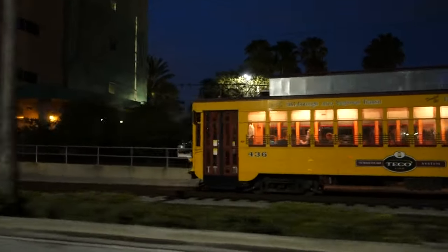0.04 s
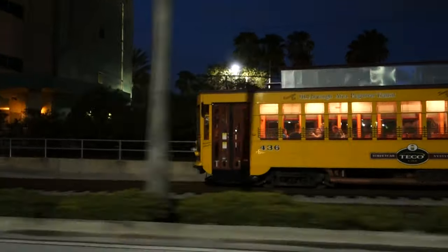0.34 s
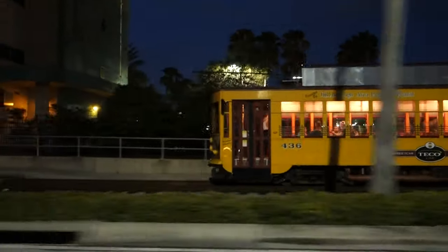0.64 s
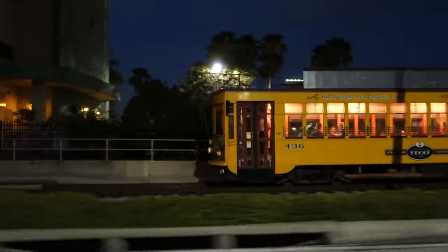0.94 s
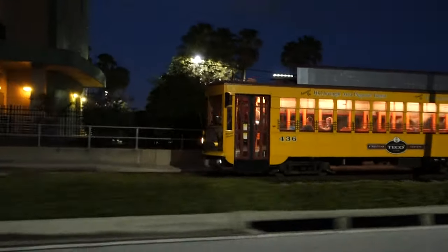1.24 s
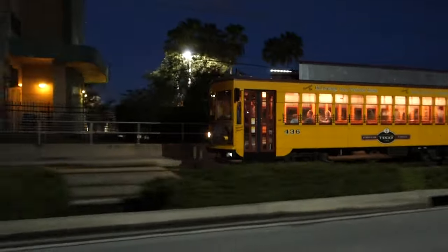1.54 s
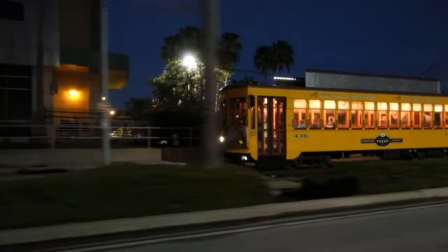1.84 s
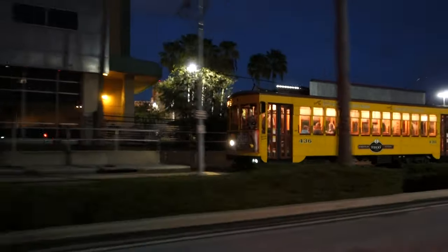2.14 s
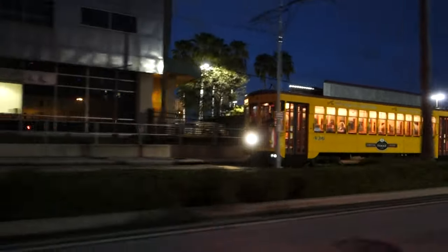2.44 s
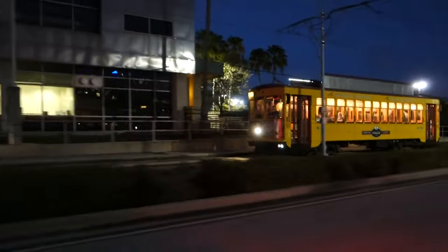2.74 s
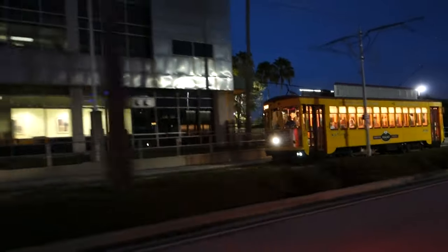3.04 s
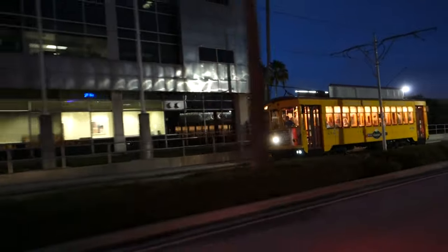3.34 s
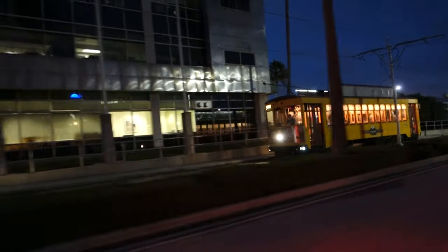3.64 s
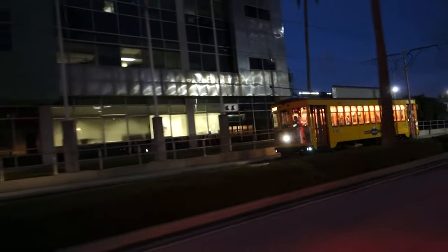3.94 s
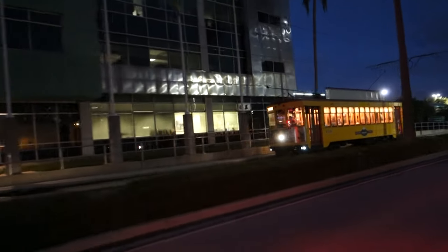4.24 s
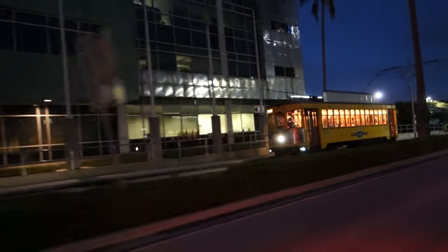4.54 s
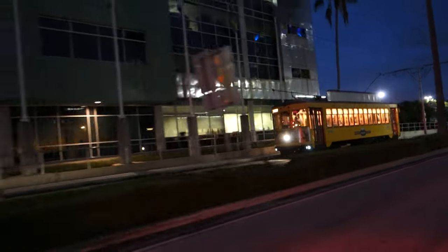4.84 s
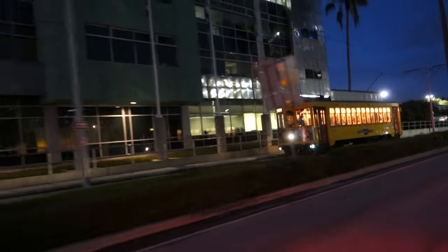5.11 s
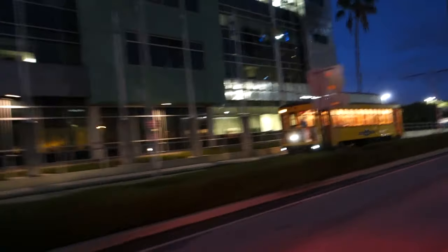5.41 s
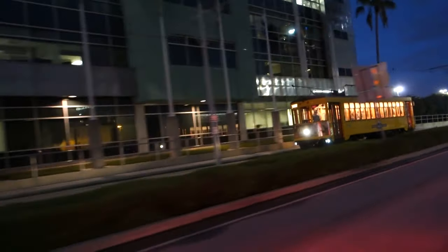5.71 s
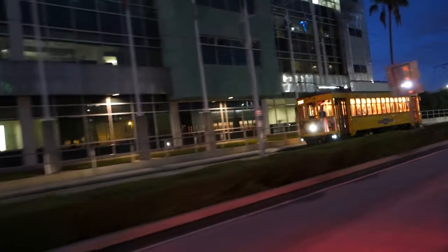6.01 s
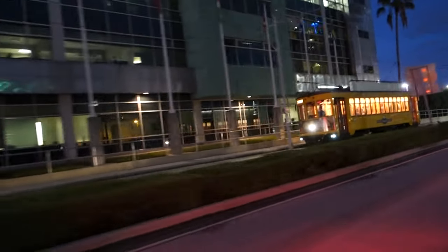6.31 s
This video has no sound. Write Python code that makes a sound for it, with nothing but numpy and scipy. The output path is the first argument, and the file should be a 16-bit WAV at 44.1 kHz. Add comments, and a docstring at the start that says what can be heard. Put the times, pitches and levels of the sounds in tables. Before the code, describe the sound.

Wind tears at a microphone by the open window of a car moving along a city street. It starts as a dense, rasping roar with crackles and sharp pops, strongest about a second in. Around halfway the rush drops away, leaving separate dull thumps and short puffs of air. A low rumble of car and road runs underneath throughout.

```python
"""Wind tearing at a microphone port, at the open window of a car on a city street.
The slipstream is a dense roar at first, then separate buffets as the flow eases.
Faster air makes smaller eddies and a brighter rasp; single eddies thump and pop on the port,
with crackles and ticks on top. Car and road rumble underneath. A fast limiter holds the blows down."""
import sys
import numpy as np
from scipy import signal
from scipy.fft import rfft, irfft, next_fast_len
from scipy.io import wavfile
from scipy.ndimage import uniform_filter1d

SR = 44100
rng = np.random.default_rng(int(sys.argv[2]) if len(sys.argv) > 2 else 0)


def waveform_to_disk(signal):
    """Save audio, clipped to [-1, 1], as 16-bit WAV at the path in sys.argv[1]."""
    frames = np.transpose(np.atleast_2d(signal))
    scaled = np.clip(frames, -1, 1) * 32767
    samples = np.round(scaled).astype(np.int16)
    wavfile.write(sys.argv[1], SR, samples)


N = 280917
TIME_S = np.arange(N) / SR
FULL_FLOW_DB = -10

# steady stream over the port: time_s, strength_db
STREAM = [(0.0, -13), (0.04, -29.5), (0.12, -21.5), (0.44, -18), (0.52, -13.5), (0.6, -1), (0.69, -6.5),
          (0.79, -15), (0.86, -5), (1.06, -1), (1.24, -15), (1.28, -18.5), (1.66, -22), (2.27, -20.5),
          (2.44, -26), (2.56, -18), (2.72, -17), (2.84, -37.5), (3.7, -41), (4.6, -42), (6.37, -43)]
# large eddies hitting the port: start_s, strength_db, hold_s, treble_db
BUFFETS = [(0.087,-14.5,0.022,-6), (0.172,-7,0.0098,-0.5), (0.232,-16,0.0083,8), (0.262,-17,0.026,14),
           (0.334,-10,0.0081,-11), (0.398,-9.5,0.0095,-9), (0.486,-11.5,0.01,6), (0.532,-13,0.015,5),
           (0.837,-14,0.028,21), (0.987,-5,0.025,-4), (1.043,-7.5,0.067,-8), (1.235,-2.5,0.02,-9.5),
           (1.339,-9,0.0051,-5), (1.507,-5,0.0056,-10.5), (1.644,-5.5,0.025,-17.5), (1.667,-6,0.0051,2),
           (1.909,-6.5,0.012,-13.5), (1.989,-10,0.013,-12), (2.059,-6,0.015,-11.5), (2.258,-15,0.005,-5),
           (2.436,-13,0.0015,4), (2.544,-11,0.0068,-1.5), (2.66,-16.5,0.026,-1.5), (2.78,-21,0.0028,3),
           (2.929,-14.5,0.015,-12.5), (2.994,-14,0.0065,-19), (3.032,-17.5,0.0061,-12),
           (3.06,-15.5,0.0043,-15), (3.097,-20,0.014,-20), (3.209,-21,0.0037,-19), (3.329,-20.5,0.0069,-10),
           (3.404,-17.5,0.0068,-5), (3.486,-24.5,0.013,-6), (3.532,-14.5,0.0076,-6), (3.689,-18,0.016,-29),
           (3.723,-17,0.0099,-17), (3.847,-25.5,0.021,-29), (3.893,-17.5,0.022,-22), (3.911,-15,0.011,-16),
           (4.078,-20,0.012,-8.5), (4.247,-23,0.037,-27), (4.329,-14,0.028,-24), (4.407,-19,0.039,-31),
           (4.54,-24,0.0068,-25), (4.638,-28.5,0.0072,-11.5), (4.699,-25,0.036,-30), (4.831,-14,0.0051,-15),
           (4.909,-22.5,0.011,-24), (5.004,-13,0.0058,-31), (5.151,-11.5,0.0068,-13), (5.206,-17,0.019,-16),
           (5.335,-18,0.0095,-11.5), (5.428,-24,0.028,-28), (5.537,-17,0.0073,-33), (5.774,-31.5,0.03,-16),
           (6.188,-26,0.0075,-31), (6.364,-11,0.012,-39)]


def from_db(db):
    return 10 ** (np.asarray(db) / 20)


def power_db(power):
    return 10 * np.log10(np.maximum(power, 1e-12))


def rms_one(x):
    return x / np.sqrt(np.mean(x ** 2) + 1e-20)


def in_time(rows):
    """Time curve at every sample."""
    time_s, value = np.transpose(rows)
    return np.interp(TIME_S, time_s, value)


def at_hz(rows, hz):
    """Table lookup on a log-frequency axis."""
    known_hz, value = np.transpose(rows)
    return np.interp(np.log(np.maximum(hz, 1)), np.log(known_hz), value)


def bins_hz():
    """Frequencies of the padded spectrum."""
    return np.fft.rfftfreq(2 * next_fast_len(N // 2 + SR // 10), 1 / SR)


def lowpass(order, cutoff_hz):
    return signal.butter(order, cutoff_hz, fs=SR, output="sos")


def drift(rate_hz):
    """Smooth random curve, rms 1."""
    hop, settle = 20, 2000
    pole = np.exp(-2 * np.pi * rate_hz * hop / SR)
    white = rng.standard_normal(N // hop + settle + 2)
    slow = signal.lfilter([1], [1, -2 * pole, pole * pole], white)[settle:]
    return np.interp(np.arange(N) / hop, np.arange(len(slow)), rms_one(slow))


def smooth_power(x, window_s):
    size = int(window_s * SR)
    return uniform_filter1d(uniform_filter1d(np.mean(x ** 2, axis=0), size), size)


def evened(x, window_s):
    """Noise with its chance swells levelled, power kept."""
    return rms_one(x * from_db(-power_db(smooth_power(x, window_s)))) * x.std()


def scattered(per_s, level_db, spread_db):
    """Randomly timed impulses of uneven size."""
    return (rng.random(N) < per_s / SR) * from_db(level_db + spread_db * rng.standard_normal(N))


def snaps(hits, decay_s, band_hz):
    """A tiny noise burst per impulse."""
    envelope = signal.lfilter([1], [1, -np.exp(-1 / (decay_s * SR))], hits + 1e-18)
    bandpass = signal.butter(3, band_hz, "band", fs=SR, output="sos")
    return signal.sosfilt(bandpass, envelope * rng.standard_normal(N))


def stereo_noise(colour, likeness):
    """Spectrum of two partly correlated noises, their mean at rms 1; steep skirts outside the colour."""
    hz = bins_hz()
    skirts = np.clip(hz / colour[0][0], 0, 1) ** 4 * np.clip(colour[-1][0] / (hz + 1), 0, 1) ** 8
    white = rfft(rng.standard_normal((2, 2 * len(hz) - 2)))
    mid, side = white * from_db(at_hz(colour, hz)) * skirts
    alike = at_hz(likeness, hz)
    pair = np.sqrt(1 + alike) * mid + np.sqrt(1 - alike) * side * [[1], [-1]]
    return pair / irfft(pair.mean(axis=0)).std()


def through_port(spectrum):
    """Turbulence at the port reaches the right channel weaker and phase-shifted."""
    # channel balance: freq_hz, left_minus_right_db
    balance = [(40, .7), (200, .6), (400, 2.4), (650, 4), (880, 8.5), (1400, 7.2), (1850, 5.6), (2500, 14),
               (3700, 6.8), (5300, 17.4), (9500, 24), (13000, 7.8)]
    # phase between channels: freq_hz, right_lead_rad
    lead = [(20, .2), (90, 0.26), (200, 0.98), (450, 1.78), (1000, 1.92), (4000, 1.65), (12000, 0.41)]
    hz = bins_hz()
    right = from_db(-at_hz(balance, hz)) * np.exp(1j * at_hz(lead, hz))
    return spectrum * np.array([np.ones_like(right), right]) * 2 / np.abs(1 + right)


def port_noise(colour):
    """Stereo turbulence at the port, padded past N samples."""
    # likeness of the channels: freq_hz, correlation
    likeness = [(50, 1), (300, 0.67), (1200, 1), (3500, 0.64), (6000, 0.91), (10000, 0.14)]
    return irfft(through_port(stereo_noise(colour, likeness)))


def airflow(flutter_db, flutter_hz, grain_db, grain_hz):
    """Flow strength and extra rasp in dB: a fluttering stream with lulls, plus buffets, finely grained."""
    # stream breaks away from the port: centre_s, length_s, drop_db
    lulls = [(0.207, 0.017, 11), (0.322, 0.02, 16), (0.513, 0.025, 8), (1.016, 0.013, 17.5),
             (1.094, 0.01, 25), (1.482, 0.021, 24), (1.554, 0.021, 17), (1.948, 0.037, 13),
             (2.461, 0.014, 33), (2.645, 0.038, 31), (2.766, 0.025, 20), (3.273, 0.048, 14),
             (3.819, 0.058, 45), (4.22, 0.061, 15), (4.47, 0.055, 35), (4.59, 0.037, 15), (5.07, 0.066, 10),
             (5.29, 0.042, 24), (5.837, 0.095, 25)]
    attack_s, release_s, swirl_s, swirl_db = 0.0024, 0.0018, 0.0093, -35
    steady_db = in_time(STREAM)
    unrest = 1 - 0.45 * np.clip(0.5 + (steady_db - steady_db.max()) / 8, 0, 1)  # fastest is steadiest
    flutter = 2 * (1 - np.exp(drift(flutter_hz) / 2))  # dips deeper than it peaks
    stream_db = steady_db + unrest * flutter_db * flutter
    for centre_s, length_s, drop_db in lulls:
        stream_db -= drop_db * np.exp(-np.minimum((2 * (TIME_S - centre_s) / length_s) ** 2, 20))
    eddies, rasp = np.zeros((2, N))
    for start_s, strength_db, hold_s, treble_db in BUFFETS:
        near = slice(max(int((start_s - 0.2) * SR), 0), int((start_s + 0.25) * SR))
        before_s = np.maximum(start_s - TIME_S[near], 0)
        after_s = np.maximum(TIME_S[near] - start_s - hold_s, 0)
        core = np.exp(-before_s / attack_s - after_s / release_s)
        swirl = from_db(swirl_db) * np.exp(-(before_s + after_s) / swirl_s)
        eddy_power = from_db(strength_db) ** 2 * (core ** 2 + swirl ** 2)
        eddies[near] += eddy_power
        rasp[near] += treble_db * eddy_power
    power = from_db(stream_db) ** 2 + eddies
    flow_db = power_db(power) + unrest * grain_db * np.tanh(drift(grain_hz))
    return flow_db, rasp / power


def roar(flow_db, rasp_db, rasp_hz, dull_hz):
    """Eddies in half-octave bands, each growing with the flow at its own rate; the bands below 2.5 kHz are cut
    off above dull_hz."""
    # roar spectrum: freq_hz, density_db
    colour = [(82, -15), (140, -4), (260, 0.5), (545, -1.5), (1220, -4), (1460, -8.5), (2290, -13.5),
              (3540, -26.5), (4660, -27), (8200, -43.5), (15500, -61.5)]
    # growth with the flow: freq_hz, db_per_db
    growth = [(150, 2.04), (260, 0.38), (480, .5), (950, 0.8738), (1900, 0.99), (2700, 1.29), (3800, 0.98),
              (6000, 1.5), (14000, 2)]
    level_db, fizz_hz, fizz_onset_db = -17.5, 4030, -4.5
    noise = rfft(evened(port_noise(colour), window_s=0.075))
    half_octaves = 2 * np.log2(np.maximum(bins_hz(), 1))
    fizz_db = np.minimum(flow_db - fizz_onset_db, 0)  # the top dies quickly in slower air
    large, small = np.zeros((2, 2, N))
    for step in range(13, 29):
        hz = 2 ** (step / 2)
        band = irfft(noise * np.clip(1 - np.abs(half_octaves - step), 0, 1))[:, :N]
        rasp_share = (hz ** 2 / (hz ** 2 + rasp_hz ** 2)) ** 2
        fizz_share = 1 / (1 + (fizz_hz / hz) ** 8)
        growth_db = at_hz(growth, hz) * (flow_db - FULL_FLOW_DB)
        eddies = large if hz < 2500 else small
        eddies += band * from_db(growth_db + rasp_share * rasp_db + fizz_share * fizz_db)
    return from_db(level_db) * (signal.sosfiltfilt(lowpass(3, dull_hz), large) + small)


def rumble(flow_db, inertia_s, wander_db, wander_hz):
    """Low wind rumble that follows the flow and is turned down in the strongest gusts."""
    # rumble spectrum: freq_hz, density_db
    colour = [(18, -13.5), (45, -3.5), (65, -2), (120, -5), (220, -8)]
    # heaves from the biggest eddies: centre_s, rise_db
    surges = [(0.3, 11), (0.42, -1), (0.63, 18), (1.8, 8), (2.11, 3), (2.42, 5), (2.8, 7), (2.99, 5.5)]
    full_db, knee_db, surge_s = -23.5, -27, 0.018
    excess_db = power_db(uniform_filter1d(from_db(flow_db) ** 2, int(inertia_s * SR))) - knee_db
    level_db = full_db + np.minimum(0.53 * excess_db, -0.2 * excess_db)  # rises to the knee, then falls
    for centre_s, rise_db in surges:
        level_db += rise_db / (1 + ((TIME_S - centre_s) / surge_s) ** 2) ** 2
    noise = evened(port_noise(colour)[:, :N], window_s=0.09)
    return from_db(level_db + wander_db * drift(wander_hz)) * noise


def car(body_db, waver_db, waver_hz):
    """Body rumble, tyre hiss on the road, and a narrow wavering hiss as something passes."""
    # body spectrum: freq_hz, density_db
    body_colour = [(25, 13.5), (110, 4.5), (200, -9.5), (460, -11.5), (600, -11), (1200, -8), (1550, -19.5),
                   (2100, -21.5), (2800, -27), (3300, -48)]
    # tyre hiss: time_s, level_db
    tyre_level = [(0, -67), (2.8, -75), (4.2, -81), (5.3, -75), (6.37, -76.5)]
    # tyre spectrum: freq_hz, density_db
    tyre_colour = [(3000, 5.5), (4900, 11), (5700, 1.5), (8500, -1), (11000, -8), (15500, -9)]
    # passing hiss spectrum: freq_hz, density_db
    pass_colour = [(3450, 3), (3950, -6.5), (4600, 6.5), (5150, -1.5), (5350, -21.5)]
    # likeness of the channels: freq_hz, correlation
    likeness = [(50, 0.94), (200, 0.76), (600, 0.14), (3000, 0.12)]
    pass_s, half_width_s, peak_db = 3.4, 0.38, -74.5
    pass_db = peak_db - power_db(1 + ((TIME_S - pass_s) / half_width_s) ** 8)
    pass_db += waver_db * drift(waver_hz)
    layers = [(body_db, body_colour), (in_time(tyre_level), tyre_colour), (pass_db, pass_colour)]
    return sum(from_db(db) * irfft(stereo_noise(colour, likeness))[:, :N] for db, colour in layers)


def spits(air_db, right_db):
    """Fast air spits sharp clicks at the port, fewer and softer as it slows."""
    drive = from_db(np.minimum(air_db - FULL_FLOW_DB, 0))
    hits = scattered(per_s=600 * np.sqrt(drive), level_db=-27, spread_db=4) * drive
    clicks = snaps(hits, decay_s=0.00008, band_hz=(2200, 17000))
    return signal.sosfilt(lowpass(1, 3200), clicks) * from_db([[0], [right_db]])


def crackles(gain_db, left_db):
    """Bright snaps on the right: random ones in strong flow, and short runs that hurry and fade."""
    # runs of snaps: start_s, level_db, length_s
    runs = [(0.018, -26, .012), (0.076, -22, .012), (0.129, -26, .012), (0.161, -21, .012),
            (0.304, -25.5, .02), (1.8896, -34, .004), (1.939, -33, .004), (2.335, -36, .02),
            (2.387, -28, .004), (2.4455, -27.5, .02), (2.747, -29, .012), (2.822, -28, .02),
            (2.948, -30, .004), (3.019, -35, .012), (3.123, -39.5, .02), (3.4226, -34.5, .004),
            (5.1672, -30, .028)]
    gap_s, loss_db, hurry_exponent, strong_flow_db = 0.0075, 3, 0.89, -20.5
    drive = from_db(np.minimum(in_time(STREAM) - strong_flow_db, 0))
    hits = scattered(per_s=44, level_db=-51, spread_db=5.5) * drive
    for start_s, level_db, length_s in runs:
        for k in range(int((length_s / gap_s) ** (1 / hurry_exponent)) + 1):
            hits[int((start_s + gap_s * k ** hurry_exponent) * SR)] = from_db(level_db - k * loss_db)
    bursts = snaps(hits, decay_s=0.00081, band_hz=(5700, 10000))
    return from_db(gain_db) * bursts * from_db([[left_db], [0]])


def thumps(gain_db, decay_s, dull_hz):
    """Eddies slap the port with dull knocks; each buffet also knocks, then pushes while it holds."""
    # hardest slaps: start_s, level_db
    slaps = [(2.921, -7), (3.206, -9.5), (3.373, -11.5), (3.588, -17), (3.624, -11), (3.657, -8.5),
             (3.816, -9.5), (4.049, -10.5), (4.335, -12), (4.634, -12.5), (4.907, -13.5), (4.702, -5.5),
             (4.753, -13.5), (4.807, -11), (4.99, -11), (5.031, -13), (5.2, -11), (5.41, -9), (5.431, -15),
             (5.526, -14), (5.653, -14), (5.748, -13), (5.765, -5.5), (6.002, -11), (6.187, -7)]
    # knock spectrum: freq_hz, density_db
    colour = [(70, 4), (170, 0.5), (440, 7.5), (650, -2), (1100, -9.5)]
    knock_db, push_db = -28.5, -23.5
    drive = from_db(0.35 * (in_time(STREAM) - FULL_FLOW_DB))
    hits = scattered(per_s=26, level_db=-14, spread_db=5) * drive
    for start_s, level_db in slaps:
        hits[int(start_s * SR)] = from_db(level_db)
    pole = np.exp(-1 / (decay_s * SR))
    for start_s, _, hold_s, _ in BUFFETS:
        start = int(start_s * SR)
        hits[start] += from_db(knock_db)
        hits[start:start + int(hold_s * SR)] += from_db(push_db) * (1 - pole)
    envelope = signal.lfilter([from_db(gain_db)], [1, -pole], hits + 1e-18)
    knocks = envelope * port_noise(colour)[:, :N]
    dull = lowpass(2, dull_hz)
    return signal.sosfilt(dull, signal.sosfilt(dull, knocks))


def pops(gain_db, decay_cycles, dull_hz):
    """A tight eddy bursts on the port: a pressure swing that dies in a cycle or two."""
    # hard pops: start_s, level_db, pitch_hz
    bursts = [(1.49, -8.5, 850), (1.881, -3, 710), (2.406, -9, 800), (2.781, -13.5, 1104),
              (2.862, -14.5, 820), (2.97, -14, 560), (2.9983, -6, 1270), (3.4899, -16, 1754),
              (3.528, -15, 1014), (4.2638, -19.5, 1295), (4.542, -15.5, 608), (4.83, -15.5, 894),
              (5.1435, -7, 600), (5.32, -12.5, 618), (5.545, -11, 1300)]
    age_s = np.arange(SR // 40) / SR
    pressure = np.zeros(2 * len(bins_hz()) - 2)
    for start_s, level_db, pitch_hz in bursts:
        start = int(start_s * SR)
        swing = np.sin(2 * np.pi * pitch_hz * age_s) * np.exp(-pitch_hz * age_s / decay_cycles)
        pressure[start:start + len(swing)] += from_db(level_db + gain_db) * swing
    pressure = signal.sosfilt(lowpass(3, dull_hz), pressure + 1e-18)
    return irfft(through_port(rfft(pressure)))[:, :N]


def ticks(gain_db, right_db):
    """Thin, very bright ticks, mostly on the left."""
    # single ticks: start_s, level_db
    events = [(1.637, -31), (1.711, -38), (2.426, -31), (2.66, -34), (2.793, -30), (2.996, -31),
              (3.92, -43), (5.151, -39), (5.339, -45)]
    hits = np.zeros(N)
    for start_s, level_db in events:
        hits[int(start_s * SR)] = from_db(level_db + gain_db)
    return snaps(hits, decay_s=0.00046, band_hz=(3500, 17000)) * from_db([[0], [right_db]])


def limiter(x, threshold_db, share, window_s):
    """Turns both channels down by a share of the excess level, evening out hard blows."""
    excess_db = np.maximum(power_db(smooth_power(x, window_s)) - threshold_db, 0)
    return x * from_db(-share * excess_db)


def scene():
    """Wind on the port over the noise of the ride."""
    flow_db, rasp_db = airflow(flutter_db=3.5, flutter_hz=53.4, grain_db=5.0, grain_hz=272)
    flicker_db = 3 * drift(rate_hz=250)
    wind = roar(flow_db, rasp_db + flicker_db, rasp_hz=1660, dull_hz=3450)
    wind += rumble(flow_db, inertia_s=0.014, wander_db=-0.5, wander_hz=16)
    blows = thumps(gain_db=-10.5, decay_s=0.0073, dull_hz=1450)
    blows += pops(gain_db=-0.5, decay_cycles=0.97, dull_hz=3140)
    sputter = crackles(gain_db=-1.5, left_db=-28.5) + ticks(gain_db=-7, right_db=-8)
    sputter += spits(flow_db + rasp_db, right_db=-10)
    return wind + blows + sputter + car(body_db=-39.5, waver_db=2.0, waver_hz=8)


def record(dry):
    """Fast limiter, then a steep treble cut."""
    top_cut = signal.ellip(12, 0.1, 80, 15850, fs=SR, output="sos")
    return signal.sosfilt(top_cut, limiter(dry, threshold_db=-17, share=0.76, window_s=0.0046))


dry = scene()
out = record(dry)
waveform_to_disk(out)
```